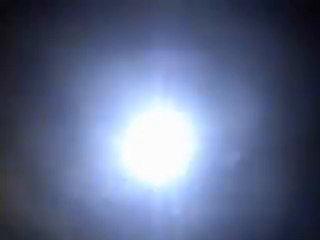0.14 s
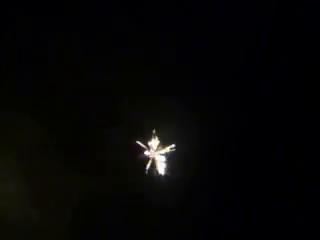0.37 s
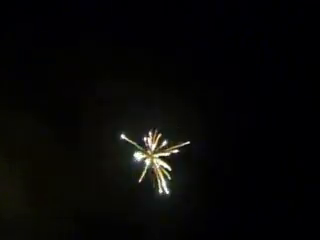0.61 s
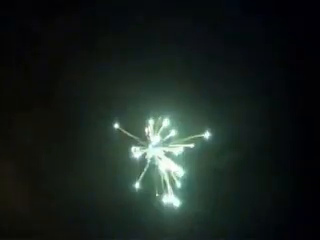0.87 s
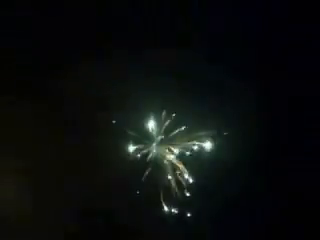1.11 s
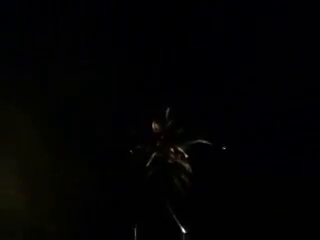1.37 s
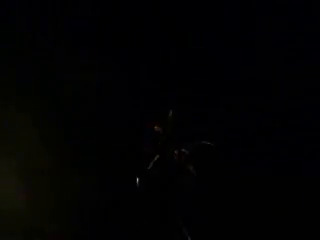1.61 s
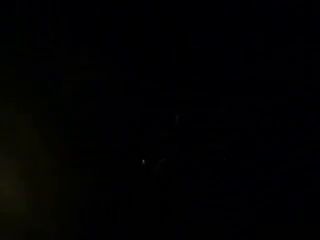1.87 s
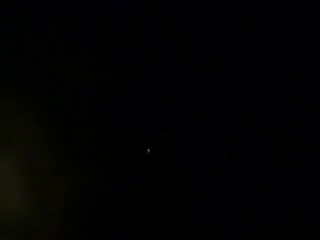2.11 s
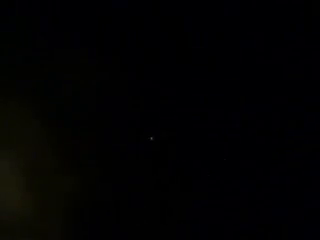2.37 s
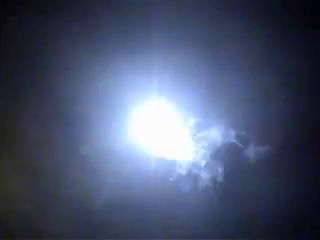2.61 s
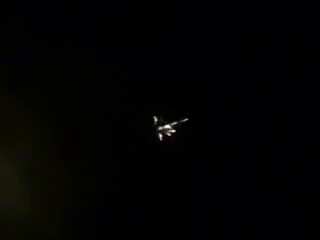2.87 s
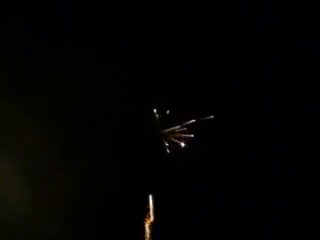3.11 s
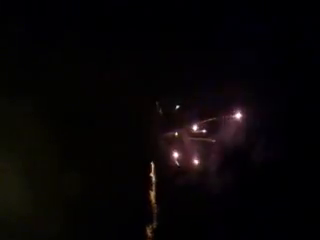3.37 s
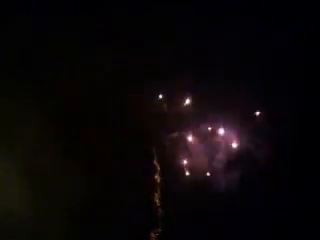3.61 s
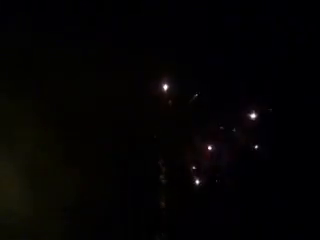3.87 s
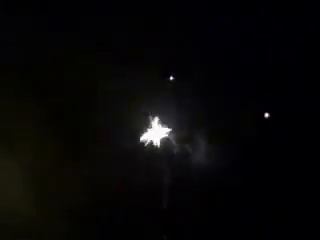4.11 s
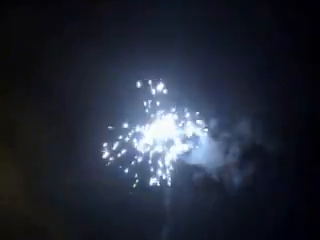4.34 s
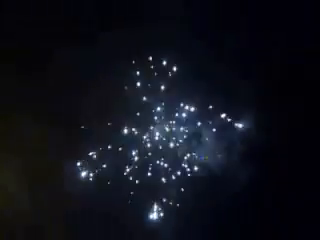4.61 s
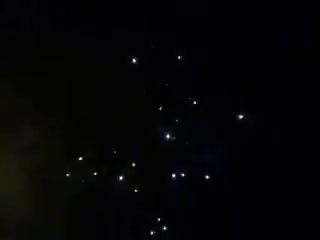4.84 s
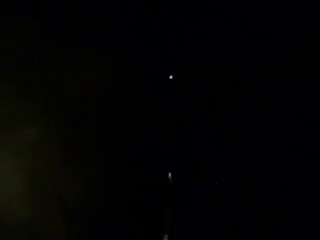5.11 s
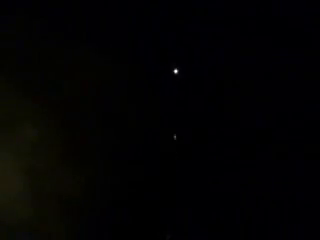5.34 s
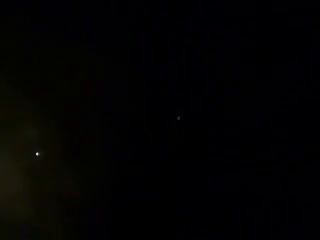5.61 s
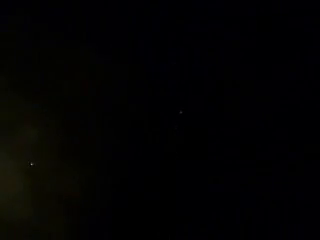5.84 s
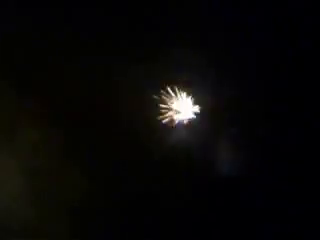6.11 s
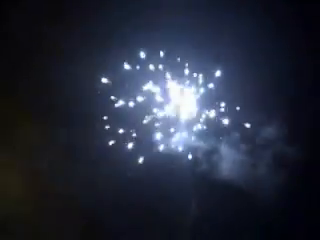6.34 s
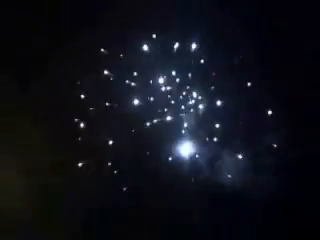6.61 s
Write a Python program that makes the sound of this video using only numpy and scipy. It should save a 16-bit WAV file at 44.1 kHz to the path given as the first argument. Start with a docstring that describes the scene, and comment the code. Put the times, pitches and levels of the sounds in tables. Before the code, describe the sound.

Night, outdoors among buildings, a small overloaded stereo microphone. It opens on the dying echo of a far volley with faint pops. At 0.4 s a shell bursts overhead: a hard cracking shock, doubled off the ground, then a dense roar of reflections. A strong far pop lands at 0.9 s. At 1.2 s a launch tube thumps, hollow and booming with a spitting jet, its rumble lingering. Around 2.0-2.4 s distant pops cluster, with soft thuds near 2.7 s. A second launch thump at 2.8 s rolls on longer, with scattered pops to 3.9 s as it fades. At 4.4 s another huge bang crashes and echoes. A third thump at 4.8 s leaves a hollow note and a brief hissy ring. Far pops dot the fade, bunching near 5.9 s. The last burst slams at 6.3 s, its echo still roaring when the sound ends.

```python
"""Among buildings at night, a firework battery: tubes thump as they launch shells and the shells burst overhead.
Bangs are pressure shocks and booming tube notes; each rolls on as shaped noise, a long field of echoes
that darkens as it dies. Farther fireworks pop and thud in the gaps, as smeared booms with weak cracks.
A small stereo microphone overloads on the loud bangs; the finished sound is cut off near 8 kHz."""
import sys
import numpy as np
from scipy import signal
from scipy.fft import rfft, irfft, next_fast_len
from scipy.io import wavfile
from scipy.ndimage import uniform_filter1d, map_coordinates

SR = 44100
rng = np.random.default_rng(int(sys.argv[2]) if len(sys.argv) > 2 else 0)


def how_loud(loudness_db):
    """Turn decibels into a plain amplitude multiplier (0 dB gives 1, 20 dB gives 10)."""
    steps = np.asarray(loudness_db, float) / 20
    return 10 ** steps


def dump(signal):
    """Clip the signal to [-1, 1] and save it as 16-bit WAV at the path in sys.argv[1]."""
    limited = np.clip(np.atleast_2d(signal).T, -1, 1)
    pcm = np.round(limited * 32767).astype(np.int16)
    wavfile.write(sys.argv[1], SR, pcm)


N = 296350  # length of the scene in samples


def unit(x):
    """Scale to rms 1."""
    return x / np.sqrt(np.mean(x ** 2) + 1e-20)


def along(points, hz):
    """Read a curve of (frequency, value) points on a log frequency axis."""
    f, v = np.transpose(points)
    return np.interp(np.log(hz + 1), np.log(f + 1), v)


def filtered(x, response):
    """Filter x by a complex response that is a function of frequency."""
    m = next_fast_len(x.shape[-1] + 8192)
    return irfft(rfft(x, m) * response(np.fft.rfftfreq(m, 1 / SR)), m)[..., :x.shape[-1]]


def resonance(x, hz, width_hz):
    """Pass x through one resonance, then scale it to rms 1."""
    return unit(filtered(x, lambda f: 1j * f * width_hz / (hz ** 2 - f ** 2 + 1j * f * width_hz)))


def noise_pair(length, apart):
    """Stereo noise: one noise shared by both sides, plus a separate one for each side."""
    return rng.standard_normal(length) + apart * rng.standard_normal((2, length))


def decaying(x, db):
    """Shape x by a level curve in dB."""
    return how_loud(db) * x


def add(out, s, x):
    """Mix a stereo piece in at time s."""
    piece = out[:, max(round(s * SR), 0):][:, :x.shape[1]]
    piece += x[:, :piece.shape[1]]


# colour of the echoes: (frequency [Hz], relative level per Hz [dB])
ECHO_COLOUR = [(15, -61.5), (25, -24), (96, -13), (234, -7), (370, -4.5), (407, -2.5), (761, -5.5),
               (944, -9), (1040, -9.5), (2300, -22), (5870, -39), (7290, -43), (7840, -50.5), (10200, -79),
               (17200, -120)]
# how alike left and right are: (frequency [Hz], likeness [0 to 1])
LIKENESS = [(30, .7), (70, 1), (240, 0.88), (500, 0.74), (1000, 0.33), (4200, 0.43), (6000, 1)]
# balance of the echoes: (frequency [Hz], left over right [dB])
ECHO_BALANCE = [(60, -1.5), (160, 1.0), (410, 0.0), (1080, -4), (2820, -3), (7390, 0.5)]


def echo_noise(patchy_db, slower_db, quick_db):
    """Countless overlapping reflections: stereo noise with patches and random unevenness in level."""
    z = signal.stft(rng.standard_normal((2, N)), nperseg=512)[2]
    patches = rng.standard_normal(z.shape[1:])
    for axis in (0, 1):
        patches = uniform_filter1d(patches, size=8, axis=axis)
    pair = signal.istft(z * how_loud(patchy_db * unit(patches)), nperseg=512)[1][:, :N]
    # random level wobble, one point every 400 samples and one every 100
    slower = map_coordinates(rng.standard_normal(N // 400 + 4), [np.arange(N) / 400])
    quick = map_coordinates(rng.standard_normal(N // 100 + 4), [np.arange(N) / 100])
    uneven = pair * how_loud(slower_db * slower + quick_db * quick)

    def mid_side(hz):
        # the more alike the two sides, the more goes to the middle
        turn = np.arccos(np.clip(along(LIKENESS, hz), 0, 1)) / 2
        return how_loud(along(ECHO_COLOUR, hz)) * [np.cos(turn), np.sin(turn)]

    mid, side = filtered(uneven, mid_side)
    stereo = np.array([mid + side, mid - side])
    return filtered(stereo, lambda hz: how_loud(along(ECHO_BALANCE, hz) * [[.5], [-.5]]))


# echo fields of the bursts; the fall is scaled by the shares in FALL_SHARE:
# (time [s], level [dB], near walls answer for [s], fall [dB/s], left over right [dB])
BURST_FIELDS = [(.447, -9.5, 0.29, 28, -0.5), (4.376, -9.5, 0.26, 23.5, 3), (6.355, -9.5, 0.33, 33, 2)]
# echo fields of the launches:
# (time [s], level [dB], near walls answer for [s], fall [dB/s], left over right [dB])
LAUNCH_FIELDS = [(1.225, -11.5, 0.18, 37, .5), (2.815, -11.5, 0.52, 27, 0.083),
                 (4.798, -12.5, 0.24, 37.8, -1)]
# echo fields of far volleys, the first already dying:
# (time [s], level [dB], near walls answer for [s], fall [dB/s], left over right [dB])
VOLLEY_FIELDS = [(0, -26.5, 0.013, 45.4, -1.7), (2.07, -29.5, .04, 45, -0.46), (5.96, -26.5, .06, 46.3, 0)]
# what fresh echoes of a burst favour: (frequency [Hz], level [dB])
BURST_FAVOURS = [(110, -5), (230, -3), (400, -2.5), (700, 0.5), (1300, 2), (4200, 8.5)]
# what fresh echoes of a launch favour: (frequency [Hz], level [dB])
LAUNCH_FAVOURS = [(110, 0), (230, -1), (400, 2), (700, 0), (1300, 4), (4200, 12.5)]
# what far echoes favour: (frequency [Hz], level [dB])
FAR_FAVOURS = [(110, -2.8), (230, -1.5), (400, -1.5), (700, 0), (1300, -0.5), (2500, -1.5), (4200, -5)]
# the air eats the treble from the start:
# (frequency [Hz], share of the fall while near walls answer [ratio], share after [ratio])
FALL_SHARE = [(110, 0.27, 1.03), (300, .25, 0.85), (700, 0.28, 1.135), (1550, 0.44, 1.02), (2800, 0.94, 1),
              (4400, 0.85, 1.28), (7000, 1.34, 1.76)]
# late rumble from far hillsides and far displays, heard in the gaps: (time [s], level [dB])
FAR_RUMBLE = [(0, -29.5), (.29, -31.5), (.43, -33.5), (1.2, -23.5), (1.95, -32.5), (2.38, -33.5),
              (2.52, -37), (2.66, -40.5), (2.8, -36), (4.05, -31.5), (4.36, -34), (5.75, -32),
              (6.17, -35.5), (6.33, -31)]
# night air and microphone hiss: (frequency [Hz], level on top of the echo colour [dB])
AIR_HISS = [(110, -38), (700, -56), (4200, -31)]


def echo_gain(hz, t):
    """Left and right echo strength near one frequency: all fields, far rumble and hiss add as powers."""
    build_s = 0.019  # a field swells over this time, reaching full strength at its listed time
    knee_s = 0.047  # how soft the turn from the first fall to the later one is
    early_share, late_share = (along([(row[0], row[k]) for row in FALL_SHARE], hz) for k in (1, 2))
    rumble_db = np.interp(t, *np.transpose(FAR_RUMBLE)) + along(FAR_FAVOURS, hz)
    power = how_loud(2 * rumble_db) + how_loud(2 * along(AIR_HISS, hz))
    groups = ((BURST_FIELDS, BURST_FAVOURS), (LAUNCH_FIELDS, LAUNCH_FAVOURS), (VOLLEY_FIELDS, FAR_FAVOURS))
    for fields, favours in groups:
        for s, db, hold, fall, lean_db in fields:
            age = np.maximum(t - s, 0)
            late = knee_s * np.logaddexp(0, (age - hold) / knee_s)
            fallen_db = fall * (early_share * (age - late) + late_share * late)
            level_db = db + along(favours, hz) - fallen_db + lean_db * np.array([[.5], [-.5]])
            build = np.clip(1 + (t - s) / build_s, 0, 1) ** 6
            power = power + how_loud(2 * level_db) * build
    return np.sqrt(power)


def echo_field():
    """Each half octave of the echo noise dies at its own pace, as walls and air take the treble first."""
    noise = echo_noise(patchy_db=0.33, slower_db=0.14, quick_db=1.5)
    noise = noise / np.std(filtered(noise.mean(axis=0), lambda hz: (hz > 200) & (hz < 1500)))
    t, now = np.arange(0, N / SR, .002), np.arange(N) / SR
    out = np.zeros((2, N))
    m = next_fast_len(N + 8192)
    spectrum, hz = rfft(noise, m), np.fft.rfftfreq(m, 1 / SR)
    for centre in 110 * 2 ** np.arange(0, 7, .5):
        # neighbouring bands cross-fade; everything below 110 Hz joins the lowest
        share = np.clip(1 - 2 * abs(np.log2(np.maximum(hz, 110) / centre)), 0, 1)
        band = irfft(spectrum * share, m)[:, :N]
        out += band * [np.interp(now, t, gain) for gain in echo_gain(centre, t)]
    body = np.interp(now, t, echo_gain(550, t).mean(axis=0))
    width = (body / how_loud(-9.0)) ** .08  # late echoes come from far off, nearer the middle
    mid, side = out.mean(axis=0), width * (out[0] - out[1]) / 2
    return np.array([mid + side, mid - side])


# a narrow hissy ring in the last launch's tail:
# (time [s], level [dB], frequency [Hz], width [Hz], fade [dB/s])
HISSY_RING = (4.9, -28, 2330, 200, 30)


def ring():
    """Narrow noise, resonating twice, that fades in, flickers and dies away."""
    s, db, hz, width_hz, fade = HISSY_RING
    out, age = np.zeros((2, N)), np.arange(SR) / SR
    hiss = noise_pair(SR, apart=.45)
    tone = resonance(resonance(hiss, hz, width_hz), hz, width_hz)
    flicker_db = 4.5 * map_coordinates(rng.standard_normal(20), [age * 15])
    fade_in = 1 - np.exp(-age / .04)
    add(out, s, decaying(fade_in * tone, db - fade * age + flicker_db))
    return out


# far pops and single slaps off walls:
# (time [s], boom peak level [dB], boom [Hz], crack rms against boom peak [dB], echo smear [s])
FAR_POPS = [(0.2122, -12, 424, -17.5, .012), (.374, -21.5, 332, -38, 0.021),
            (0.8759, 0, 660, -14.5, 0.0025), (1.971, -12.5, 524, -29, 0.036), (2.052, -7, 610, -22, 0.017),
            (2.061, -9.5, 542, -26, 0.035), (2.067, -10, 476, -21, 0.065), (2.127, -16.5, 544, -31, 0.025),
            (2.196, -30, 5010, -17, 0.068), (2.306, -15.5, 380, -17.5, 0.017),
            (2.379, -21, 543, -11.5, 0.2), (2.774, -19, 303, -25, 0.026), (2.787, -20.5, 279, -30.5, 0.034),
            (2.961, -4, 887, -14, 0.43), (3.553, -10.5, 476, -22.5, 0.014),
            (3.898, -15.5, 343, -10.5, 0.02), (3.939, -17, 870, -15.5, 0.051),
            (4.983, -6.5, 455, -12.5, 0.014), (5.364, -10, 677, -20, 0.068),
            (5.551, -18, 400, -24.5, 0.023), (5.879, -13.5, 450, -15, 0.019),
            (5.882, -14.5, 662, -11.5, 0.021), (5.936, -17, 880, -9.5, 0.016),
            (5.944, -13.5, 867, -10.5, 0.014), (5.947, -8, 650, -34, 0.034), (5.956, -5.5, 640, -17, 0.055),
            (5.963, -10, 506, -20.5, 0.096), (6.301, -24.5, 900, -14, 0.031)]
# thuds so far off that no crack arrives: (time [s], boom peak level [dB], echo smear [s])
FAR_THUDS = [(2.638, -15.5, .023), (2.667, -16.5, 0.059), (2.706, -23, 0.014), (2.731, -18, 0.077),
             (4.242, -13.5, .05), (4.274, -16.5, 0.2), (6.3285, -13.5, 0.037)]


def far_pops():
    """Distance dulls the shock to a boom with a weak crack, smeared into a short cluster of echoes."""
    thud_hz, crack_top_hz = 253, 3000
    out, t = np.zeros((2, N)), np.arange(SR // 4) / SR
    thuds = [(s, db, thud_hz, -np.inf, smear) for s, db, smear in FAR_THUDS]
    for s, db, hz, crack_db, smear in FAR_POPS + thuds:
        # the echoes fade 60 dB over the smear, held between 3 ms and 0.4 s
        walls = decaying(noise_pair(len(t), apart=0.42), -60 * t / np.clip(smear, .003, .4))
        walls = walls / np.linalg.norm(walls[0])
        walls[:, 0] += min(1, .025 / smear)  # the longer the smear, the less is left of the first front

        def boom_response(f):
            u = 1j * f / hz
            return u / (1 + u / 1.5 + u ** 2) / (1 + u)

        def crack_response(f):
            u = 1j * f / 800
            return u ** 2 / (1 + u) ** 2 / (1 + 1j * f / crack_top_hz) ** 6

        boom, crack = filtered(walls, boom_response), filtered(walls, crack_response)
        crack_rms = np.std(crack[:, :SR // 200])  # over the first 5 ms
        pop = boom / np.abs(boom).max() + how_loud(crack_db) * crack / crack_rms
        add(out, s, how_loud(db + np.array([[-.7], [.7]])) * pop)  # a little louder on the right
    return out


# lift charges in their tubes: (time [s], level [dB], tube note [Hz])
LIFT_CHARGES = [(1.2219, 5, 320), (2.8117, 6, 330), (4.7933, 7, 375)]
# what rolls on among the walls after each launch: (tube note level [dB], low rumble level [dB])
LINGERING = [(-25, -20), (-21, -25.5), (-12.5, -39.5)]


def launches():
    """The lift charge spits a crackling jet, then the tube's air booms and its note lingers among the walls."""
    rumble_hz, rumble_width_hz = 137, 150
    out, t, long = np.zeros((2, N)), np.arange(SR // 8) / SR, np.arange(SR) / SR
    for (s, db, hz), (note_db, rumble_db) in zip(LIFT_CHARGES, LINGERING):
        phase = 2 * np.pi * hz * t + [[-.3], [.3]]  # the right port leads
        boom = decaying(-np.sin(phase), db - 60 * t / .038)
        jet = unit(uniform_filter1d(noise_pair(len(t), apart=0.32), size=7))
        rumble = resonance(noise_pair(SR, apart=0.24), rumble_hz, rumble_width_hz)
        rumble = resonance(rumble, rumble_hz, rumble_width_hz)
        note = resonance(noise_pair(SR, apart=0.24), hz, width_hz=52)
        hum = how_loud(note_db) * note + how_loud(rumble_db) * rumble
        add(out, s, boom)
        add(out, s - .001, decaying(jet, db - 13.5 - 60 * t / 0.068))
        add(out, s + .01, decaying(hum, -52 * long ** 2 - 7.2 * long))
    return out


def blast(t, width):
    """Shock front, then the longer suction; this microphone swings negative under pressure."""
    u = np.maximum(t, 0) / width
    return -(1 - u) * np.exp(-u) * (t >= 0)


# shells bursting overhead: (time [s], shock level before the housing [dB], ground echo delay [s], left lag [s])
SHELL_BURSTS = [(.4341, 14, .0112, .0001), (4.3633, 13, .0110, .0002), (6.3423, 14, .0112, .0001)]


def bursts():
    """A shock from above and again off the ground; the microphone housing swings back after each."""
    out, t = np.zeros((2, N)), np.arange(SR // 20) / SR
    width = np.array([[.0009], [.0006]])  # s, the shaded left port hears it broader

    def housing(hz):
        swing = -hz ** 2 / (220 ** 2 - hz ** 2 + 1j * hz * 260)
        return swing / (1 + 1j * hz / 4000)

    for s, db, ground, lag in SHELL_BURSTS:
        late = t - np.array([[lag], [0]])
        shocks = blast(late, width) + blast(late - ground, width)
        add(out, s, how_loud(db) * filtered(shocks, housing))
    return out


def scene():
    """All bangs, their echoes, the ring and the far pops."""
    return echo_field() + ring() + far_pops() + launches() + bursts()


def roll_off(x):
    """The treble ends steeply here."""
    return signal.sosfilt(signal.butter(12, 7990, fs=SR, output="sos"), x)


def record(dry):
    """An overloaded input stage and thin bass, then narrowed treble and a steep cut whose overshoot is clipped."""
    ceiling, top_hz = 1.15, 7930
    squashed = dry / (1 + np.abs(dry / ceiling) ** 7) ** (1 / 7)
    thin = filtered(squashed, lambda hz: 1j * hz / (50 + 1j * hz))
    mid = thin.mean(axis=0)
    # above 4250 Hz the difference between left and right shrinks, so the treble sounds narrow
    side = filtered((thin[0] - thin[1]) / 2, lambda hz: np.where(hz < 4250, 1, .22))
    stereo = np.array([mid + side, mid - side])
    narrow = filtered(stereo, lambda hz: np.clip((top_hz + 250 - hz) / 400, 0, 1) ** 2)
    return roll_off(np.clip(narrow, -1, 1))


dry = scene()
out = record(dry)
dump(out)
```